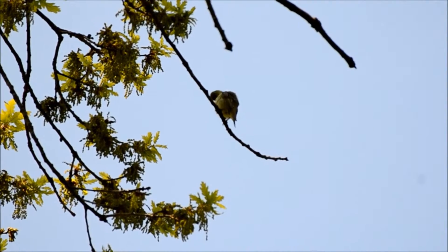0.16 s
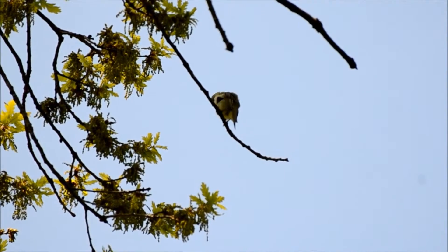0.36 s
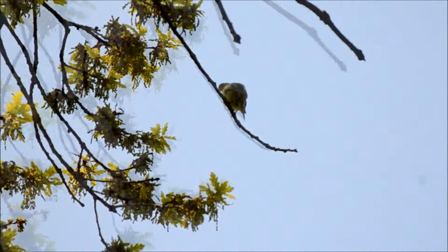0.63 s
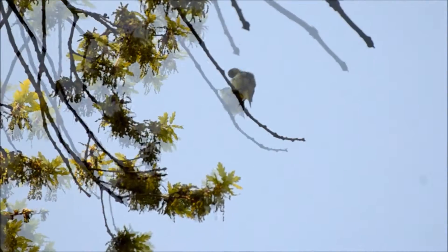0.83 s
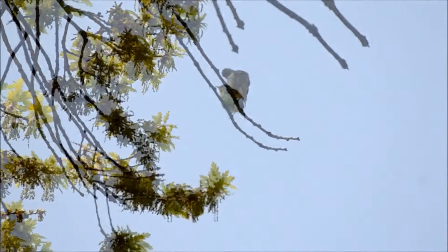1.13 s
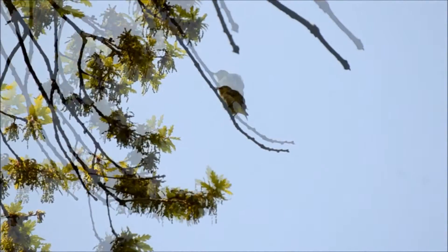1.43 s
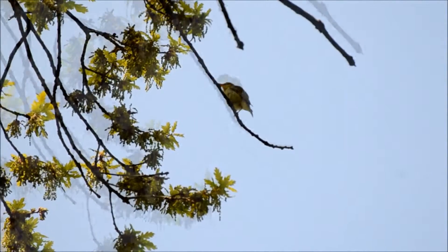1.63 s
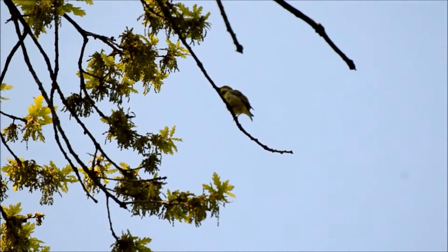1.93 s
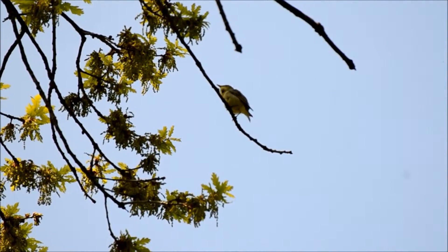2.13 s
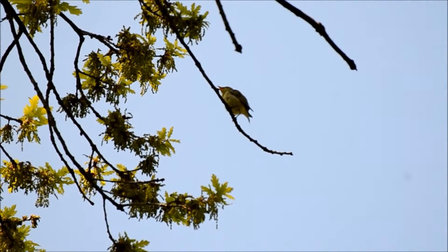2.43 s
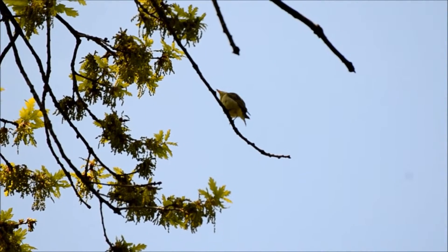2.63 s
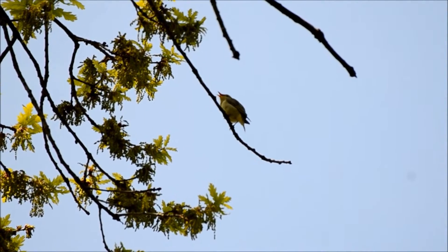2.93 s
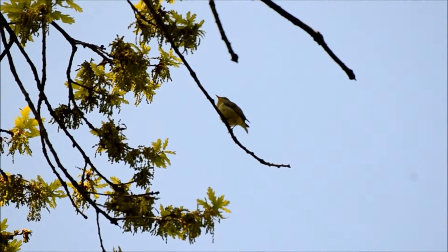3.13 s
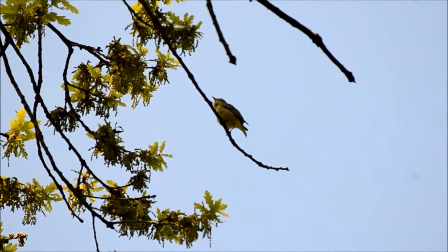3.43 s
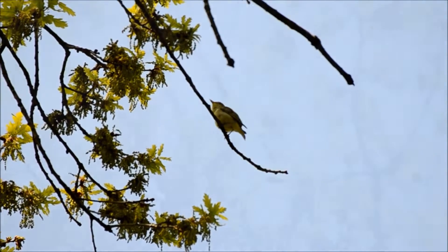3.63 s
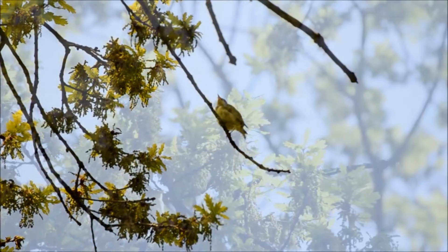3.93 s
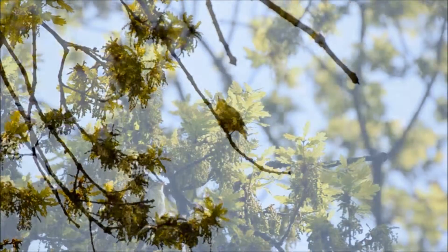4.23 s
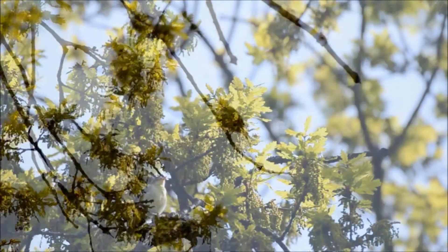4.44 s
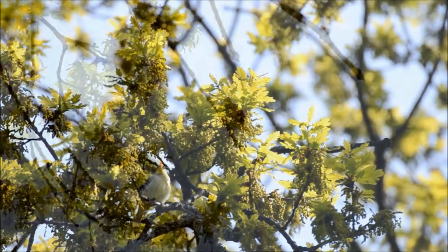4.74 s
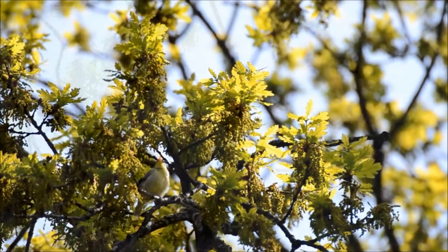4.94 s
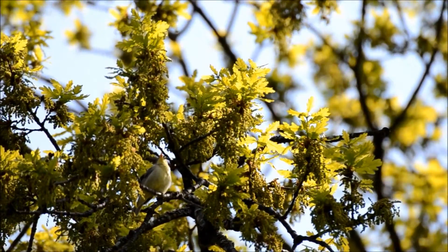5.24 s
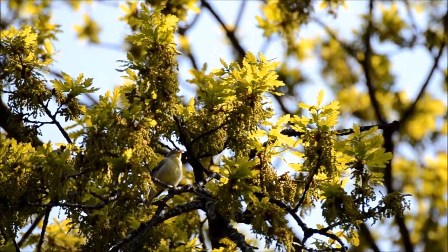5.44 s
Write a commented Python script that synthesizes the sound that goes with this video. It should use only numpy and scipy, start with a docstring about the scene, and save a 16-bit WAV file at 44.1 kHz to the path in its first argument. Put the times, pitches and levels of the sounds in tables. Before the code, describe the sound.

A small bird sings a fast, varied stream of whistles, chirps and buzzes in a tree over a faint, distant traffic hum.

```python
"""Warbler in the treetops

A warbler and its neighbours sing whistled glides, hooks, buzzes and nasal arches, each a pitch path
of the syrinx, blurred by echoes from trunks and leaves. Distant traffic drones, wind thumps a mono
microphone and a few ticks snap. A second layer of drone, low whistles and a buzz cuts in twice."""
import sys
import numpy as np
from scipy import signal
from scipy.fft import rfft, irfft
from scipy.io import wavfile
from scipy.ndimage import uniform_filter1d

SR = 44100
rng = np.random.default_rng(int(sys.argv[2]) if len(sys.argv) > 2 else 0)


def inscribe(sig):
    """Save sig as 16-bit PCM at rate SR to the path in sys.argv[1].

    A 1-D sig is mono; a 2-D sig holds one channel per row.
    Samples are clipped to [-1, 1] before scaling.
    """
    pcm = np.round(np.clip(np.atleast_2d(sig).T, -1, 1) * 32767)
    wavfile.write(sys.argv[1], SR, pcm.astype(np.int16))


N = 246078
SONG_SEND, ARCH_SEND, BUZZ_SEND = .7, .78, .62  # share sent into the wood; the rest arrives dry

# throat resonances that colour a nasal call: f/Hz, gain/dB
THROAT = [(1400, -25), (2900, -7), (4400, 0.5), (5900, -4.5), (7300, 0), (9000, -18), (11500, -26)]
def syrinx(path, glide_s=.00538, fade_s=.00074, harmonics=1):
    """Sing a path of (t/s, f/Hz, level/dB): muscles round its corners, the throat shapes overtones."""
    times, pitches, levels = np.transpose(path)
    t = np.arange(times[0], times[-1], 1 / SR)
    hz = uniform_filter1d(np.interp(t, times, pitches), int(glide_s * SR) + 1, mode="nearest")
    phase = 2 * np.pi * (np.cumsum(hz) / SR + rng.random())
    tone = np.sin(phase)
    if harmonics > 1:
        tone = 0
        for k in range(1, harmonics + 1):
            hoarse = 1 + .2 * level(band(rng.standard_normal(len(t)), 28, 180), 0)
            tone += hoarse * undb(np.interp(k * hz, *np.transpose(THROAT))) * np.sin(k * phase)
    return np.sqrt(2) * tone * undb(np.interp(t, times, levels)) * fades(len(t), fade_s)


def whistle(path):
    """A pure glide as a cue (start, sound, send); faint, far notes waver and turn husky on the way."""
    tone = syrinx(path, glide_s=.0078, fade_s=.005)
    if max(db for _, _, db in path) < -42:
        waver = undb(2.5 * walk(60)[:len(tone)])
        husk = 1 + .45 * walk(500)[:len(tone)]
        tone = tone * waver * husk
    return path[0][0], tone, SONG_SEND


# two-note motif, one path a note: t/s from the cue, f/Hz, level/dB
PAIR = [
    [(-0.005, 2675, -51), (0.03, 2788, -39), (0.065, 2781, -33.5), (0.105, 2832, -44.5),
     (0.12, 2986, -35.5), (0.14, 3680, -46)],
    [(0.21, 4720.0, -48), (0.235, 4756, -36.5), (0.265, 4200.0, -36), (0.285, 3592, -34.5),
     (0.305, 3626, -38.5), (0.335, 3767, -34)],
]
# motif cues: t/s, gain/dB
PAIR_CUES = [(2.121, -3.5), (3.542, -2.3)]
def pairs():
    """The lead motif: a rising whistle answered by a higher, falling one."""
    for s, db in PAIR_CUES:
        for path in PAIR:
            yield s + path[0][0], undb(db) * syrinx(path, glide_s=.013), SONG_SEND


# hook, up and then steeply down: t/s from the cue, f/Hz, level/dB
HOOK = [(0, 4145, -37.5), (.011, 4856, -37.5), (.015, 4330, -48), (.019, 3535, -35), (.028, 3080, -39.5),
        (.042, 2590, -51)]
# pip leading into each hook: t/s from the cue, f/Hz, level/dB
PIP = [(-.018, 5550, -46), (-.004, 5410, -63.5)]
# hook cues: t/s, gain/dB
HOOK_CUES = [(1.948, -11), (2.055, -8.5), (2.162, -9.5), (2.27, -7), (2.382, -6), (2.487, -7.5),
             (2.597, -7.5)]
def hooks():
    """A quick run of pitch flicks, each led by a pip; no two pips are alike."""
    for s, db in HOOK_CUES:
        yield s, undb(db) * syrinx(HOOK, glide_s=.0014), SONG_SEND
    for s, _ in HOOK_CUES:
        tune, effort = rng.standard_normal(2)
        pip = [(t, hz * (1 + .012 * tune), db + 2 * effort) for t, hz, db in PIP]
        yield s + PIP[0][0], syrinx(pip, fade_s=.0037), .5


# humped notes: t/s, length/s, top f/Hz, level/dB, closing fade/dB, sag/ratio to the top, send/share
HUMPS = [(0.988, .082, 3518, -40, -8, .93, 0.84), (1.474, 0.0712, 5860, -42.5, -16, 0.961, 0.57),
         (1.655, 0.0803, 5544, -42.5, -27, 0.97, 0.88), (4.774, 0.077, 5480, -47, -4, 0.96, 0.4),
         (4.958, 0.085, 6360, -48.5, -7, .93, 0.46)]
# faint partials of a hump that is the octave of a weak fundamental: f/ratio to the hump, gain/dB
HUMP_PARTIALS = [(.5, -11), (1.5, -24)]
def humps():
    """The pitch leaps up, sags along the top and drops; two of the notes carry faint partials."""
    def path(s, length, hz, db, fade_db, sag):
        foot = .66  # pitch ratio of foot to shoulder
        return [(s, foot * hz, db - 5), (s + .01166, hz, db),
                (s + length - .022, sag * hz, db), (s + length, foot * sag * hz, db + fade_db)]

    for s, *shape, send in HUMPS:
        yield s, syrinx(path(s, *shape), glide_s=.011), send
    for s, length, hz, db, fade_db, sag, _ in HUMPS[1:3]:
        for ratio, gain_db in HUMP_PARTIALS:
            yield whistle(path(s, length, ratio * hz, db + gain_db, fade_db, sag))


# nasal calls: t/s, length/s, start f/Hz, top f/Hz, end f/Hz, crest/share of length, level/dB
ARCHES = [(1.797, 0.069, 900, 1106, 954, 0.35, -53), (2.524, 0.11, 1149, 1521, 1200, 0.46, -48),
          (2.627, 0.12, 1224, 1477, 1185, 0.37, -49), (2.841, 0.12, 1150, 1495, 1213, 0.39, -47.5),
          (2.953, 0.093, 1220, 1428, 1220, 0.45, -48.5), (3.24, 0.036, 973, 1063, 1110, 0.825, -52.5),
          (4.005, 0.12, 1110, 1486, 1185, 0.47, -50.5), (4.122, 0.099, 1194, 1437, 1194, 0.44, -48)]
def arches():
    """Hoarse, rounded calls, mostly in twos; breath is weakest at the feet of each arch."""
    progress = np.linspace(0, 1, 25)
    for s, length, start_hz, top_hz, end_hz, crest, db in ARCHES:
        rising = progress < crest
        climb = np.where(rising, progress / crest, (1 - progress) / (1 - crest))
        height = np.sin(np.pi / 2 * climb) ** 1.3  # the power flattens the feet
        foot_hz = np.where(rising, start_hz, end_hz)
        hz = foot_hz + (top_hz - foot_hz) * height
        path = np.transpose([s + length * progress, hz, db - 5 * (1 - height)])
        harmonics = 8 if top_hz > 1300 else 5  # low arches are duller
        yield s, syrinx(path, fade_s=.006, harmonics=harmonics), ARCH_SEND


def slur(s, length, start_hz, end_hz, db):
    """A straight whistled glide that holds its level, then lifts slightly."""
    hold = .39  # share of the length
    knee_hz = start_hz + hold * (end_hz - start_hz)
    return whistle([(s, start_hz, db), (s + hold * length, knee_hz, db), (s + length, end_hz, db + 1.5)])


# straight glides and held notes: t/s, length/s, start f/Hz, end f/Hz, level/dB
SLURS = [(2.7, .015, 4220, 4910, -50), (0.151, 0.019, 3730, 3055, -59), (.592, 0.0327, 4500, 4185, -49.5),
         (0.654, 0.13, 1977, 2059, -62.5), (0.78, 0.069, 7386, 7185, -69), (4.43, 0.11, 8286, 7970, -71),
         (4.43, .07, 7810, 7430, -74), (0.627, 0.02, 2780, 3527, -49), (0.921, 0.031, 3657, 2905, -48.5),
         (0.947, 0.015, 3030, 3100, -46), (0.96, 0.0161, 3120, 2420, -45.5),
         (1.174, 0.0677, 7240, 7190, -65), (1.245, 0.0384, 6820, 6310, -66),
         (1.247, 0.141, 2610, 2594, -63), (1.408, 0.225, 2626, 2645, -54),
         (1.424, 0.031, 3980, 3940, -50.5), (1.629, 0.022, 2910, 3617, -48.5),
         (1.943, 0.0803, 2253, 1920, -49.5), (2.27, 0.1, 6830, 7430, -58.5),
         (2.35, 0.12, 7500, 7510, -59.5), (2.75, 0.057, 2620, 4080, -52.5),
         (2.782, 0.12, 5420, 5100, -55.5), (3.066, 0.1, 4370, 4450, -58.5), (3.161, 0.1, 4470, 4320, -57.5),
         (3.288, 0.086, 4380, 4510, -61), (3.432, 0.041, 4330, 4480, -64), (3.537, 0.032, 4353, 4460, -66),
         (3.268, 0.042, 2160, 2350, -53.5), (3.303, 0.067, 2790, 2570, -54.5),
         (3.367, 0.084, 2276, 1862, -51.5), (4.826, 0.041, 6400, 3875, -57.5),
         (4.904, 0.066, 3040, 4150, -58.5), (4.96, 0.32, 2514, 2474, -67), (5.513, 0.08, 6040, 6120, -70.5)]
# one falling glide, repeated through the song: t/s, level/dB
FALLS = [(.457, -57), (0.794, -55), (1.162, -53.5), (1.322, -52.5), (1.885, -52), (2.9, -56.5),
         (3.128, -54), (3.805, -55.5), (4.243, -55), (4.478, -54.5), (4.827, -60)]
# thin notes that hold, then plunge: t/s, hold/s, f/Hz, level/dB
PLUNGES = [(1.432, 0.017, 7950, -56), (1.61, 0.02, 7750, -52), (4.94, 0.0026, 6140, -46.5)]
def warbles():
    """Short whistled glides fill the gaps in the song."""
    for row in SLURS:
        yield slur(*row)
    for s, db in FALLS:
        yield whistle([(s, 4350, db), (s + .03, 3200, db), (s + .06, 2472, db + .5)])
    for s, hold, hz, db in PLUNGES:
        yield whistle([(s, hz, db), (s + hold, hz, db), (s + hold + .0081, 4300, db + 1.5)])


# two pairs of rising chirps: t/s from the cue, length/s, start f/Hz, end f/Hz, gain/dB
TWIN_CHIRPS = [(-.108, .047, 4270, 6300, -10.5), (-.096, .03, 5700, 7300, -6.5), (0, .024, 2930, 3880, 2),
               (.007, 0.0208, 4250, 4870, 1.5)]
# chirp cues: t/s, level/dB
TWIN_CUES = [(0.222, -52.5), (1.238, -53)]
def twin_chirps():
    """Overlapping chirps, one voice from each side of the syrinx."""
    for s, db in TWIN_CUES:
        for offset, *glide, gain_db in TWIN_CHIRPS:
            yield slur(s + offset, *glide, db + gain_db)


# long, thin falling whistle: t/s from the cue, f/Hz, level/dB
SEEP = [(0, 7500, -71.5), (.006, 8600, -58.5), (.022, 8900, -70), (0.071, 7250, -60), (.125, 6650, -66.5),
        (.195, 6120, -65), (.34, 6210, -59)]
# seep cues: t/s, gain/dB
SEEP_CUES = [(.305, -0.54), (1.313, -0.25)]
def seeps():
    """A high thread of tone slides down twice; the second one breaks off early."""
    for (s, gain_db), path in zip(SEEP_CUES, [SEEP, SEEP[:-1]]):
        yield whistle([(s + t, hz, db + gain_db) for t, hz, db in path])


# buzzes: t/s, length/s, start f/Hz, end f/Hz, sweep width/Hz, beat rate/Hz, level/dB
BUZZES = [(0.493, 0.18, 4090, 4532, 4290, 69.5, -51), (0.808, 0.039, 4180, 4320, 2750, 79, -51),
          (0.895, 0.028, 4554, 4632, 2877, 154, -50.5), (0.966, 0.044, 4540, 4760, 1685, 74, -49.5),
          (1.04, 0.043, 4612, 4650, 2000, 79, -54.5), (1.111, 0.0745, 7870, 7100, 1390, 310, -60),
          (1.585, 0.047, 5500, 3860, 980, 133, -47), (1.746, 0.11, 2145, 2544, 833.4, 94, -40),
          (3.462, 0.13, 7910, 7480, 1496, 130, -59), (4.564, 0.085, 8480, 7235, 1620, 310, -57),
          (5.222, 0.11, 6390, 6635, 895, 118, -64.5), (5.22, .09, 4277, 4830, 910, 133, -63)]
def buzz(length, start_hz, end_hz, width_hz, rate, db, sweep_s=.005):
    """Each beat is an upward sweep with its own loudness; turbulent air hisses over the same range."""
    t = np.arange(int(length * SR)) / SR
    beat = t * rate
    stroke = np.clip(beat % 1 / rate / sweep_s, 0, 1)
    centre_hz = np.linspace(start_hz, end_hz, len(t))
    phase = 2 * np.pi * np.cumsum(centre_hz + width_hz * (stroke - .5)) / SR
    pulses = undb(2 * rng.standard_normal(64))[beat.astype(int)] * np.sin(np.pi * stroke)
    lowpass = signal.butter(4, width_hz / 2, fs=SR, output="sos")
    air = level(signal.sosfilt(lowpass, rng.standard_normal(len(t))), -8)
    hiss = air * np.sin(2 * np.pi * np.cumsum(centre_hz) / SR)
    return 2 * undb(db) * (pulses * np.sin(phase) + hiss) * fades(len(t), min(length / 5, .015))


# low whistles, one path a note: t/s, f/Hz, level/dB
LOW_WHISTLES = [
    [(1.67, 1960, -49.5), (1.74, 1944, -46)],
    [(1.83, 2220, -40), (1.87, 2184, -35), (1.92, 2162, -31), (1.95, 2190, -41)],
    [(4.42, 2576, -55), (4.47, 2490, -48.5), (4.52, 2288, -45), (4.6, 2307, -58), (4.71, 2266, -63)],
    [(4.795, 1743, -52.5), (4.855, 1735, -49.5), (4.88, 2410, -49), (4.91, 2544, -45), (4.95, 2390, -52)],
    [(4.99, 2140, -54), (5.06, 2026, -42.5), (5.15, 1938, -57.5), (5.3, 2005, -62.5), (5.44, 1910, -58)],
]
def low_whistles():
    """A larger bird sings soft-edged pure tones below the warbler."""
    for path in LOW_WHISTLES:
        yield path[0][0], syrinx(path, glide_s=.007, fade_s=.0046)


def birds():
    """Route the songs to three buses: the wood, the open air and the second layer."""
    to_wood, open_air, second = np.zeros((3, N))
    cues = [*pairs(), *hooks(), *humps(), *arches(), *warbles(), *twin_chirps(), *seeps()]
    for s, length, start_hz, *shape in BUZZES:
        tone = buzz(length, start_hz, *shape)
        if start_hz < 3000:
            add(second, s, tone)
        else:
            cues.append((s, tone, BUZZ_SEND))
    for s, tone, send in cues:
        add(to_wood, s, send * tone)
        add(open_air, s, (1 - send) * tone)
    for s, tone in low_whistles():
        add(second if s < SECOND_LAYER[0][1] else to_wood, s, tone)
    return to_wood, open_air, second


def wood(x, t60_s=.46, wet_db=2):
    """Trunks and leaves scatter dense echoes that shimmer as the leaves move; treble dies sooner."""
    t = np.arange(SR) / SR
    scatter = rng.standard_normal((2, SR))
    mids = band(scatter, 500, 4800)
    echoes = mids * undb(-60 * t / t60_s) + (scatter - mids) * undb(-60 * t / (.87 * t60_s))
    onset = 1 - np.exp(-t / .00052)
    echoes *= onset / np.sqrt(t60_s * SR / np.log(1e6))
    sway = 1.212 * np.cumsum(walk(15)) * 15 / SR  # drifts between the two echo tails
    feeds = [x * np.cos(sway), x * np.sin(sway)]
    wet = sum(signal.fftconvolve(feed, tail)[:N] for feed, tail in zip(feeds, echoes))
    flutter = undb(1.5 * walk(90))
    return x * flutter + undb(wet_db) * wet


# sharp ticks: t/s, level/dB before filtering, low edge f/Hz
TICKS = [(.9226, -27.5, 1780), (3.9818, -38, 8200), (4.3595, -40, 7200), (4.4789, -40, 2200)]
def ticks():
    """Broad clicks: a snap and a millisecond of crackle."""
    out, samples = np.zeros(N), np.arange(128)
    decay = np.exp(-samples / (.00073 * SR))
    for s, db, low_hz in TICKS:
        snap = .67 * rng.standard_normal(128) + 3 * (samples < 4)
        add(out, s, band(undb(db) * snap * decay, low_hz, 8800))
    return out


# wind thumps on the microphone: t/s, relative level/dB, nominal length/s
THUMPS = [(2.813, -47, 0.086), (3.107, -45, 0.012), (3.414, -37.5, 0.0146), (3.458, -50, 0.071),
          (3.718, -49, 0.018), (3.847, -39.5, 0.019), (4.093, -46, 0.043), (4.279, -49, 0.056),
          (4.945, -48.5, 0.032), (5.014, -36.5, 0.04)]
def wind():
    """Gusts push the membrane: low turbulent bursts over a rumble that blows through the second half."""
    gust = np.interp(np.arange(N) / SR, [2.5, 2.8, 4.5, 5.15], [0, 1, 1, 0])
    push = gust * undb(-62.5 + 5 * walk(12))
    for s, db, length in THUMPS:
        add(push, s, undb(db) * np.hanning(int(1.56 * length * SR)))
    rumble = level(band(rng.standard_normal(N), 44.3, 97), -60)
    eddies = band(rng.standard_normal(N), 52, 187.5)
    envelope = np.sqrt(uniform_filter1d(eddies ** 2, size=800) + 1e-9)
    buffet = push * eddies * eddies.std() / envelope  # evened out, so the push sets the shape
    return band(buffet, 87, 400) * undb(22) + gust * rumble


# traffic spectrum, with a hum near 835 Hz: f/Hz, relative level/dB
TRAFFIC = [(25, -16.5), (122, -10), (440, -9), (785, -4), (835, 4.5), (895, -3.5), (2400, -16.5),
           (3420, -17.5), (4500, -24), (4900, -28), (9050, -33), (11400, -39.5)]
def traffic(db):
    """A distant drone whose octave bands swell together and flicker alone."""
    hz = np.arange(N // 2 + 1) * SR / N + 1
    curve_hz, curve_db = np.transpose(TRAFFIC)
    colour = undb(np.interp(np.log(hz), np.log(curve_hz), curve_db))
    out, swell = np.zeros(N), walk(.81)
    for centre_hz in 30 * 2. ** np.arange(10):
        window = np.cos(np.pi / 2 * np.clip(np.log2(hz / centre_hz), -1, 1))
        octave = irfft(rfft(rng.standard_normal(N)) * colour * window, N)
        out += octave * undb(1.2 * swell + .54 * walk(6.28))
    return level(out, db)


def undb(db):
    """Decibels to amplitude."""
    return 10 ** (np.asarray(db) / 20)


def level(x, db):
    """Set the RMS level."""
    return x * undb(db) / np.sqrt(np.mean(x ** 2))


def band(x, lo_hz, hi_hz):
    """Gentle band-pass."""
    return signal.sosfilt(signal.butter(2, [lo_hz, hi_hz], "bandpass", fs=SR, output="sos"), x)


def add(track, s, sound):
    """Mix a sound in at s seconds."""
    i = int(s * SR)
    track[i:i + len(sound)] += sound[:N - i]


def walk(rate):
    """Random levels held 1 / rate s and slewed twice."""
    hold = int(SR / rate)
    steps = np.repeat(rng.standard_normal(N // hold + 1), hold)
    return uniform_filter1d(uniform_filter1d(steps, hold), hold)[:N]


def fades(n, fade_s):
    """Soft start and end of a note n samples long."""
    from_edge = np.minimum(np.arange(n), n - np.arange(n))
    return np.sin(np.pi / 2 * np.clip(from_edge / (fade_s * SR), 0, 1))


# spans where the second layer cuts in: in t/s, out t/s
SECOND_LAYER = [(.485, 1.945), (3.69, 5.145)]
def scene():
    """Mono mix of birds, ticks, wind and traffic, with the second layer gated in twice."""
    to_wood, open_air, second = birds()
    t = np.arange(N) / SR
    gate = uniform_filter1d(1. * sum((t > start) & (t < end) for start, end in SECOND_LAYER), size=40)
    rumble = level(band(rng.standard_normal(N), 31, 65), -85)
    layer = SONG_SEND * wood(second) + (1 - SONG_SEND) * second + traffic(db=-49) + rumble
    mono = wood(to_wood) + open_air + traffic(db=-50) + gate * layer + wind() + ticks()
    return np.array([mono, mono])


def record(dry, dip_hz=7902, dip_width_hz=500, top_hz=11800):
    """The microphone housing dips near 8 kHz; the treble is cut steeply."""
    dip = signal.lfilter(*signal.iirpeak(dip_hz, dip_hz / dip_width_hz, SR), dry)
    lowpass = signal.cheby2(10, 45, top_hz, fs=SR, output="sos")
    return signal.sosfilt(lowpass, dry - .7 * dip)


dry = scene()
out = record(dry)
inscribe(out)
```